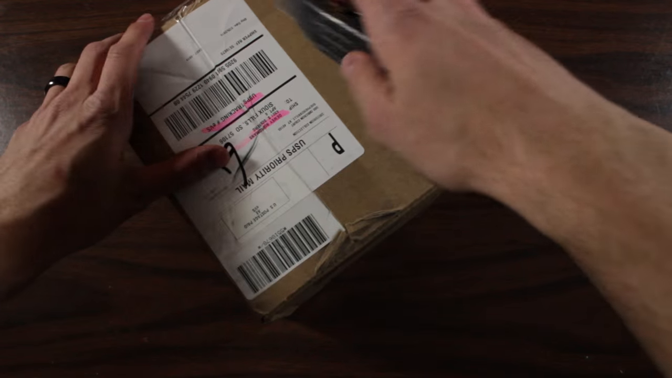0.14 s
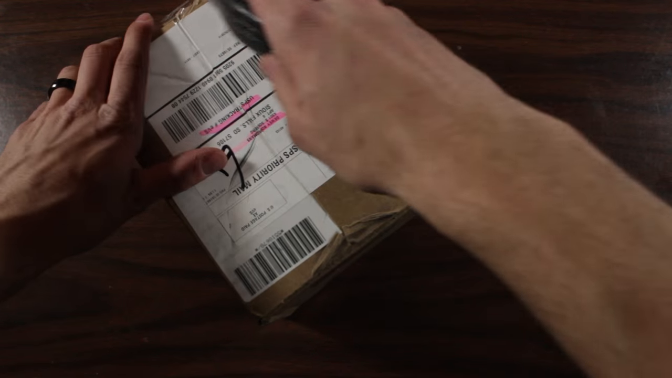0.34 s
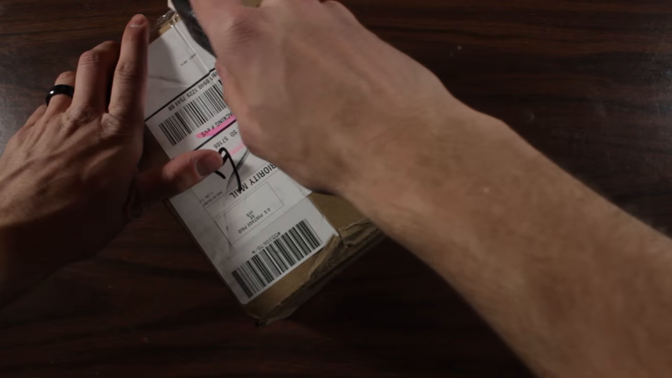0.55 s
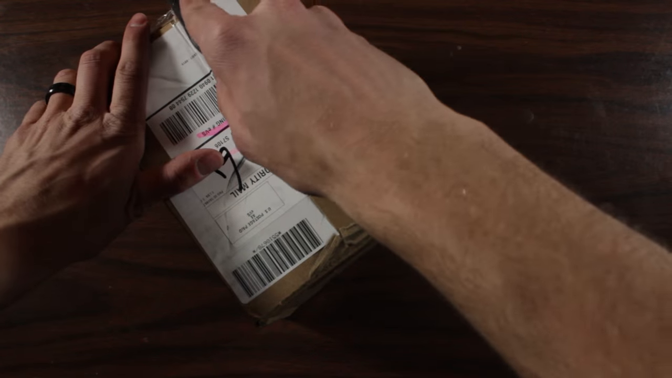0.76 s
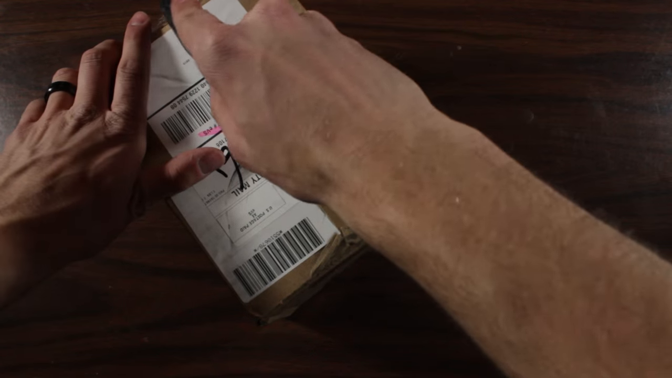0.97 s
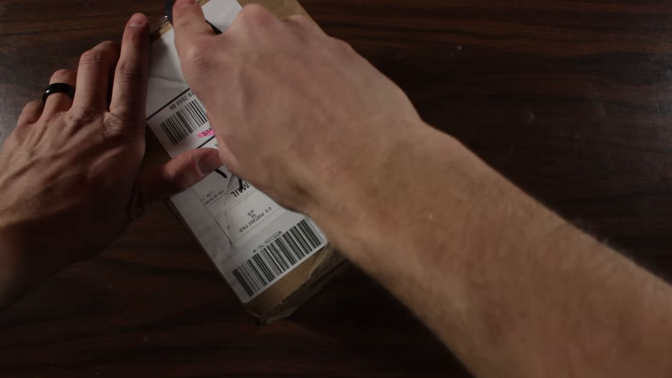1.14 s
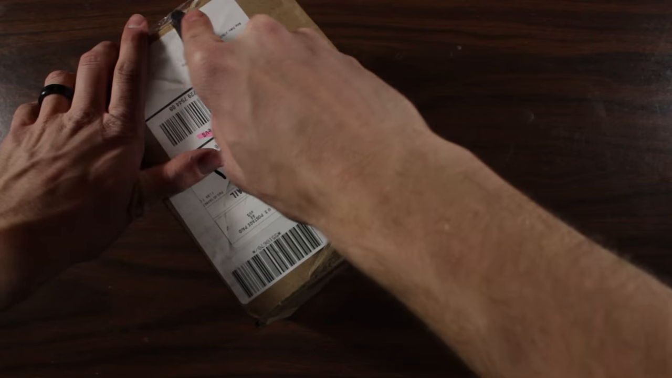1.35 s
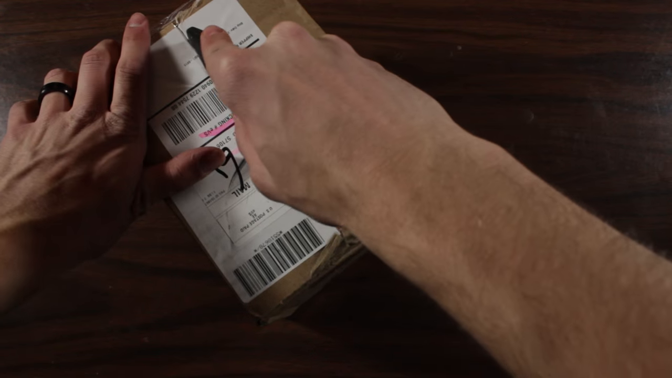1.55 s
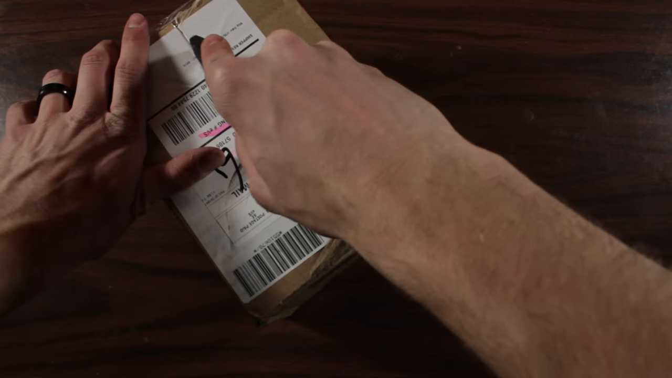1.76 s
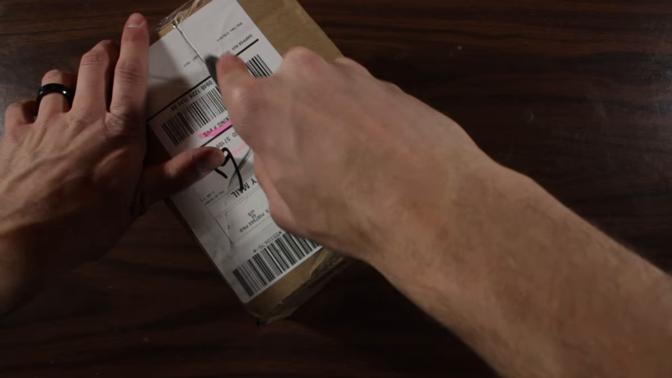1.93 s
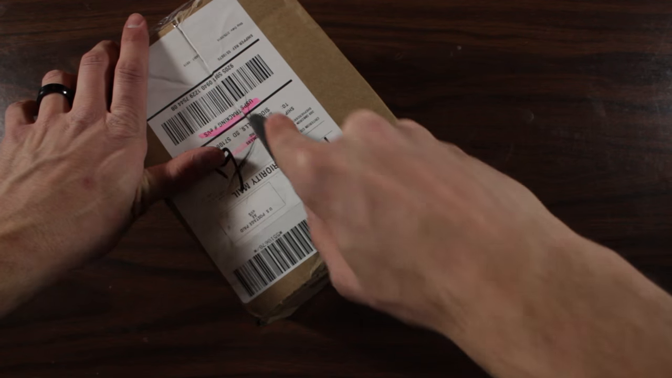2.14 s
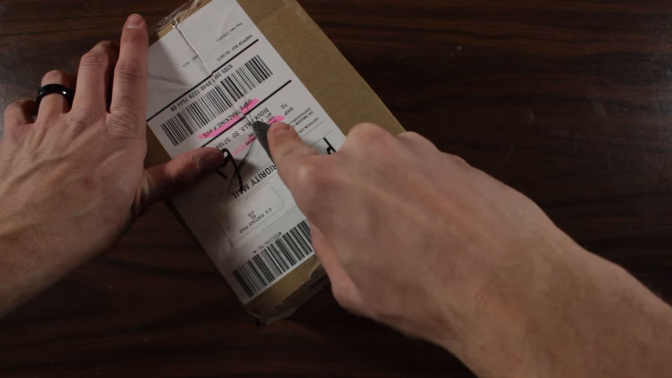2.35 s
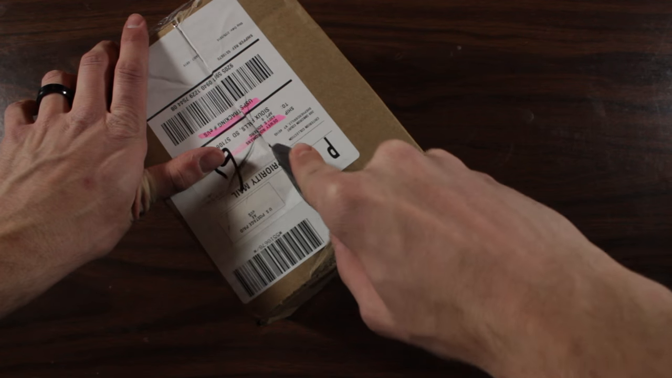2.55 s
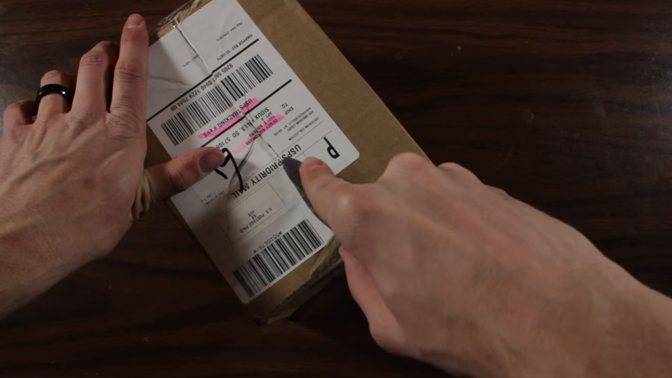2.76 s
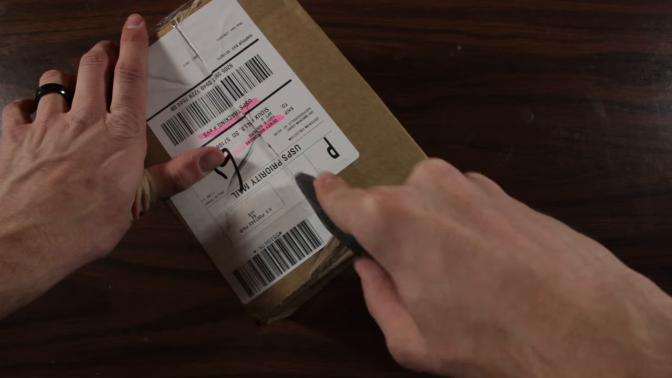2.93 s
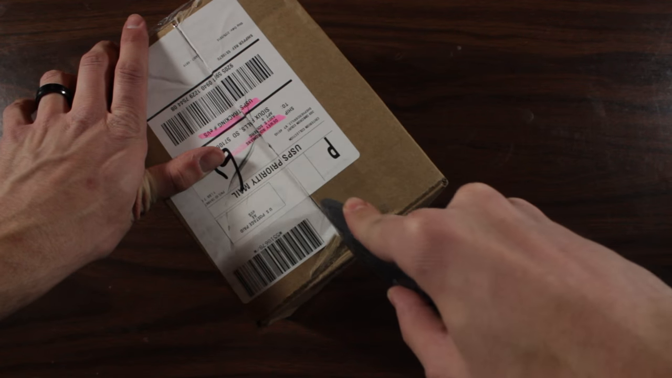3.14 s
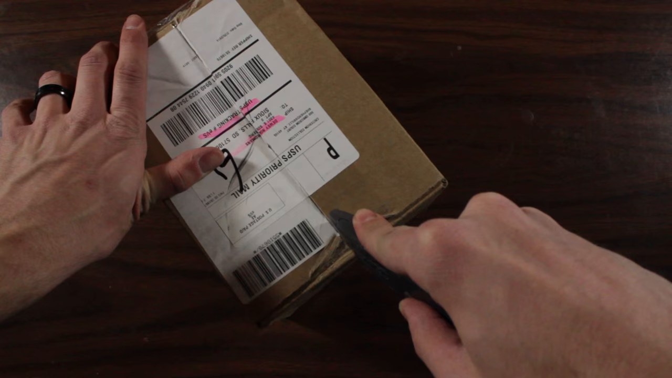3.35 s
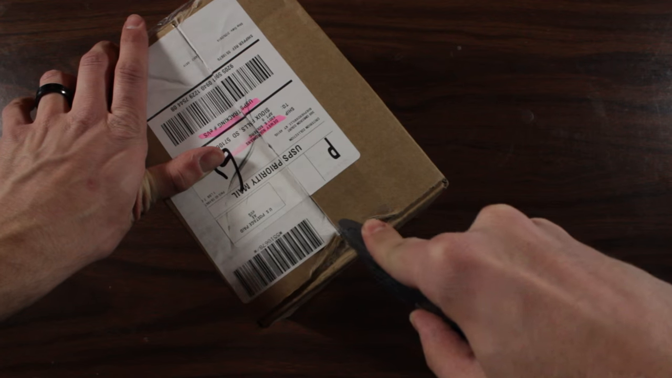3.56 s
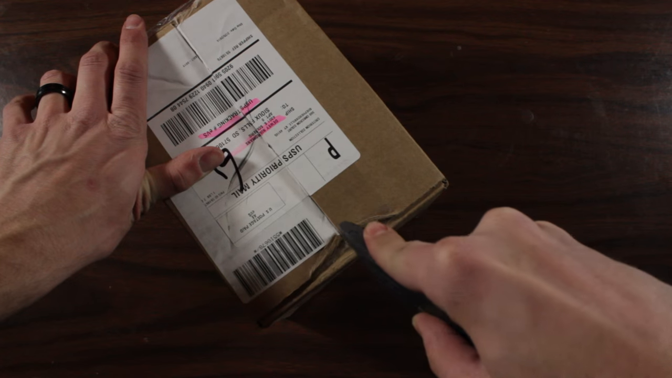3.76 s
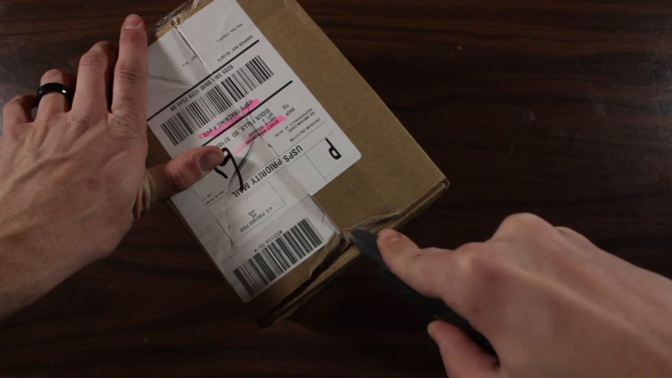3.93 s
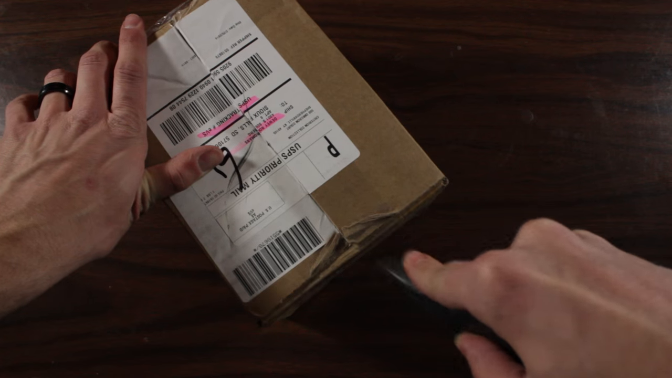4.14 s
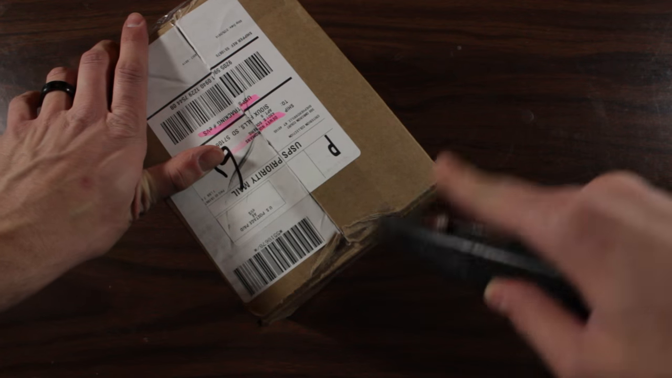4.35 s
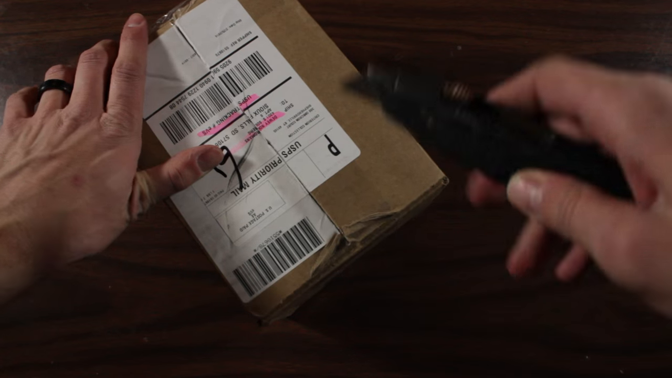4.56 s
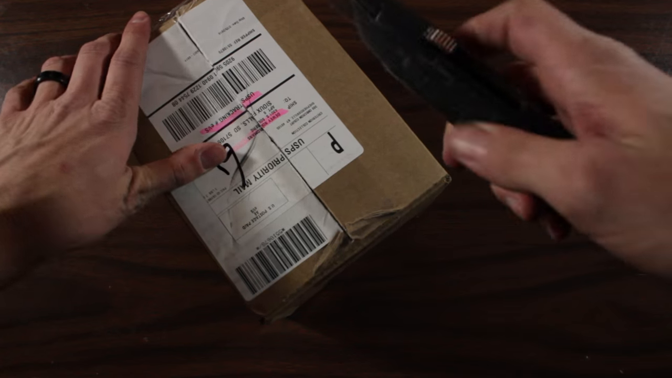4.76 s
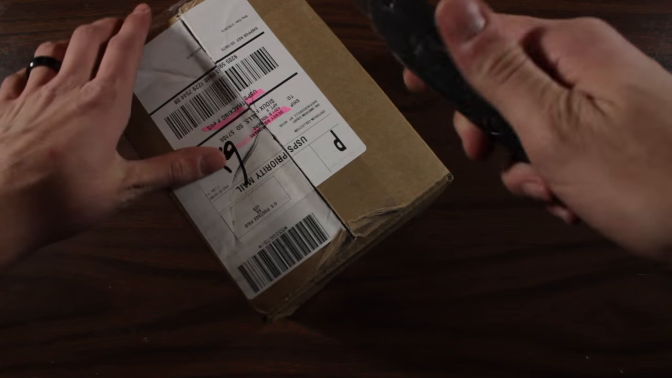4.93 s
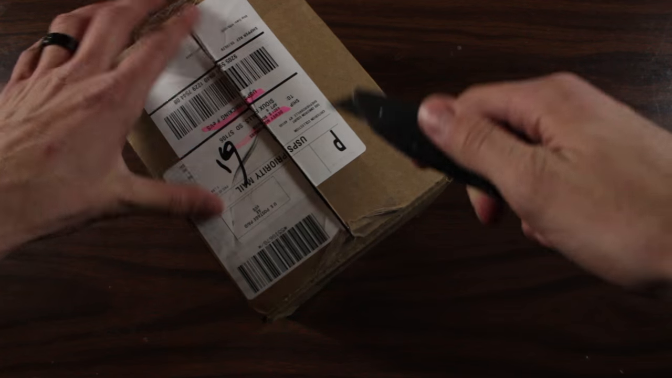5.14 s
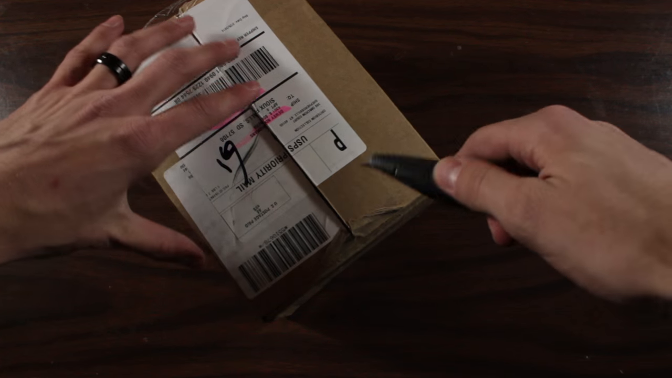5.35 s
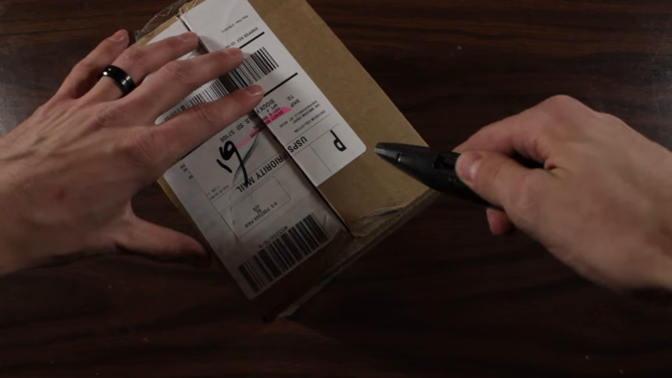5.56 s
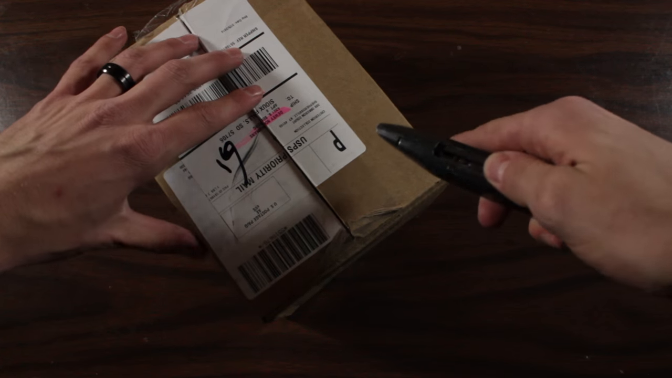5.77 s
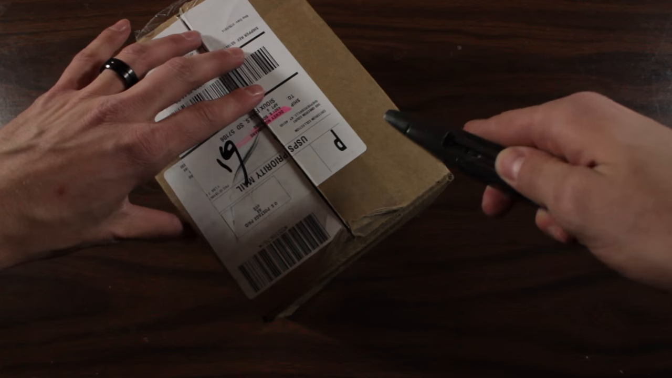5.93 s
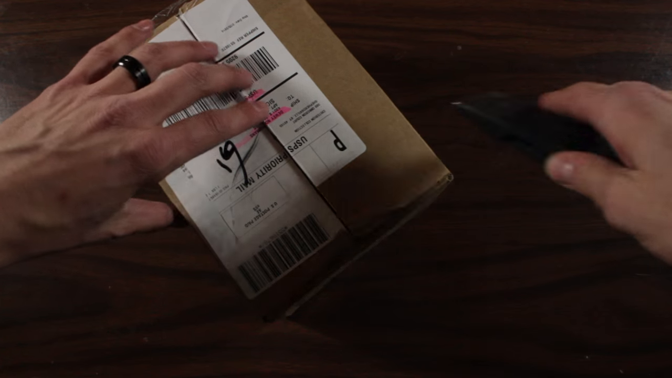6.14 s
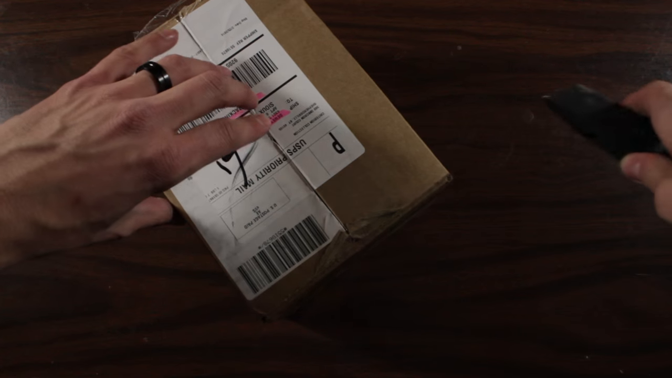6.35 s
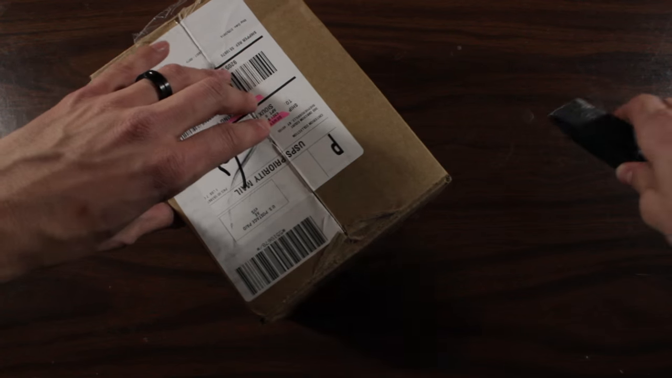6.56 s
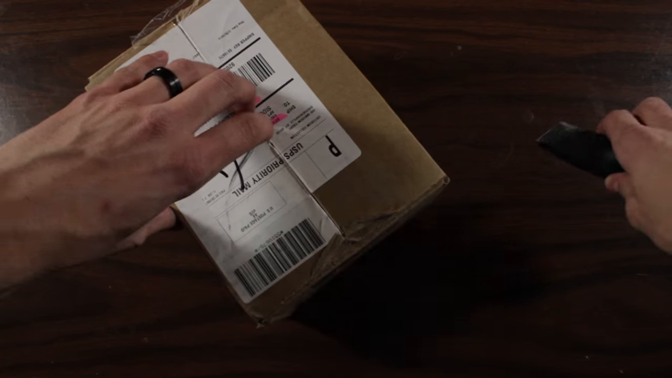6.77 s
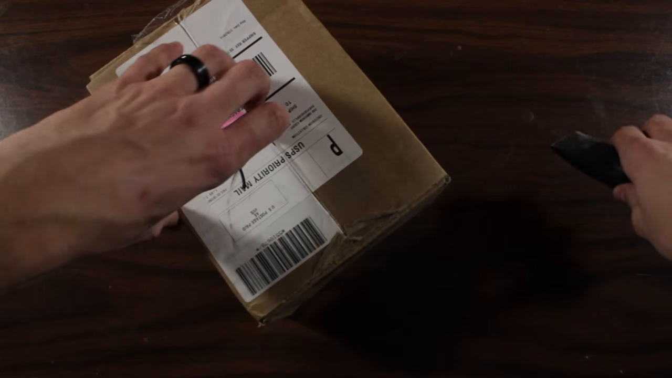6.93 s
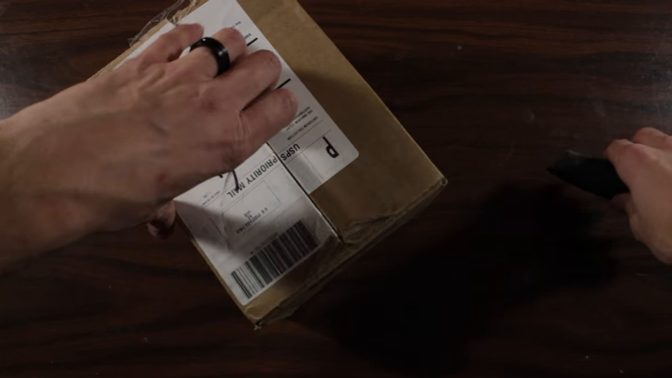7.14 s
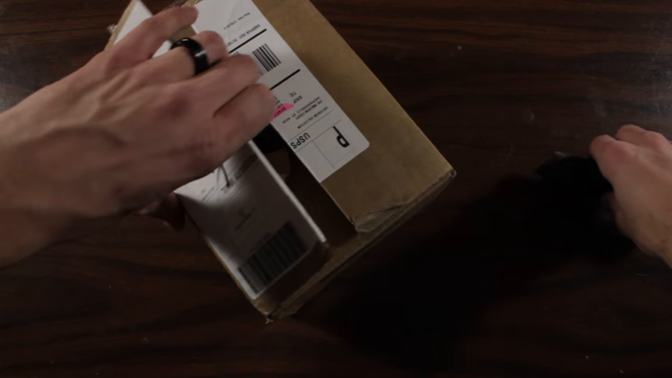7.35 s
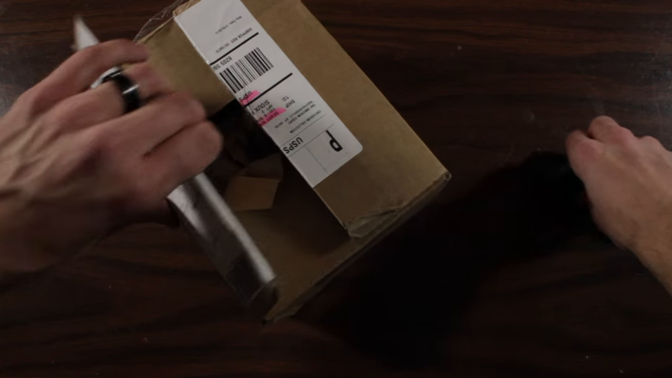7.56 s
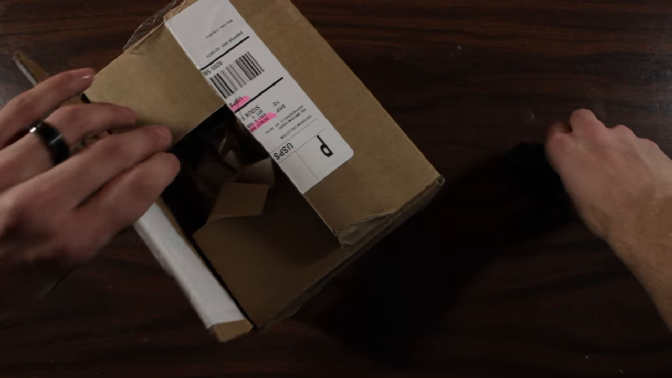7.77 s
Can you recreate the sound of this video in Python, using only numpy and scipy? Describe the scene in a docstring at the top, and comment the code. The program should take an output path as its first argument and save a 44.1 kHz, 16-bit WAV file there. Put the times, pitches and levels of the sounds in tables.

```python
"""Hands rustle faintly in a quiet, humming room; then a utility knife clicks and cuts a taped cardboard box.
Blade and hand on the card: dense random grains drive panel drumming, flap ringing, a rasp and a hiss.
Short cracks, knocks and judder bumps are noise bursts that sound in the air and ring the box; knife clicks
are bursts that ring metal modes. Near the end a hand pulls the flap open and it slaps over as dying noise.
Soft low thuds pass into the wooden table; a short diffuse tail gives the room."""
import sys
import numpy as np
from scipy import signal
from scipy.fft import rfft, irfft
from scipy.io import wavfile
from scipy.ndimage import uniform_filter1d

SR = 44100
rng = np.random.default_rng(int(sys.argv[2]) if len(sys.argv) > 2 else 0)


def output_pcm(signal):
    """Save a mono or channel-first signal as 16-bit PCM at the path in sys.argv[1].

    Samples are clipped to [-1, 1] before scaling.
    """
    pcm = np.clip(np.atleast_2d(signal).T, -1, 1) * 32767
    wavfile.write(sys.argv[1], SR, np.round(pcm).astype(np.int16))


N = 343980


def amp(db):
    """Decibels to gain."""
    return 10 ** (np.asarray(db) / 20)


def rms_one(x):
    """Scale to unit power."""
    return x / np.sqrt(np.mean(x ** 2) + 1e-20)


def filtered(x, order, hz, kind):
    """Butterworth filter."""
    return signal.sosfilt(signal.butter(order, hz, kind, fs=SR, output="sos"), x)


def coloured(x, spectrum):
    """Shape a spectrum by level points on a log frequency axis, then scale to unit power."""
    hz, level_db = np.transpose(spectrum)
    log_hz = np.log(np.maximum(np.fft.rfftfreq(len(x), 1 / SR), 1))
    gain = amp(np.interp(log_hz, np.log(hz), level_db))
    return rms_one(irfft(rfft(x) * gain, len(x)))


def resonance(x, hz, width_hz):
    """Two-pole band-pass, about unit gain at its peak."""
    r = np.exp(-np.pi * width_hz / SR)
    feedback = [1, -2 * r * np.cos(2 * np.pi * hz / SR), r * r]
    return signal.lfilter([(1 - r * r) / 2, 0, (r * r - 1) / 2], feedback, x)


def drift(rate_hz):
    """Slow random wander of unit rms: noise through a double low-pass."""
    r = np.exp(-2 * np.pi * rate_hz / SR)
    wander = signal.lfilter([1], [1, -2 * r, r * r], rng.standard_normal(N + SR))
    return rms_one(wander[SR:])   # the filter settles for 1 s


def ringing(modes, scatter_db):
    """Impulse response of a body: decaying sines, uneven in level and random in sign at each blow."""
    t = np.arange(SR // 8)[:, None] / SR
    hz, level_db, t60_s = np.transpose(modes)
    level_db = level_db + scatter_db * rng.standard_normal(len(hz))
    strength = amp(level_db) * rng.choice([-1, 1], len(hz))
    return (strength * amp(-60 * t / t60_s) * np.sin(2 * np.pi * hz * t)).sum(axis=1)


def burst(rise_ms, rough_db):
    """Rough noise that swells and dies."""
    t = np.arange(SR // 16) / SR / (max(rise_ms, .05) / 1000)   # in rise times
    roughness = amp(rough_db * rng.standard_normal(len(t)))
    return t * np.exp(1 - t) * rng.standard_normal(len(t)) * roughness


def add(out, start_s, sound, peak_db):
    """Place a sound at a time with a given peak."""
    i = round(start_s * SR)
    sound = sound[:N - i]
    out[i:i + len(sound)] += amp(peak_db) * sound / np.abs(sound).max()


# room tone spectrum: (frequency [Hz], relative level [dB])
AIR_SPECTRUM = [(15, 10), (25, -33), (48, -3.5), (102, -9.5), (200, 7), (451, -11.5), (516, -3.5),
                (1190, -3.5), (1560, -8), (7710, -14.5), (16000, -17.5)]
AIR_RMS_DB = -54.5
# distant appliance: (frequency [Hz], width of each of two passes [Hz], rms level [dB])
APPLIANCE_HUM = [(59, 12, -76), (205, 18, -60)]


def still_air():
    """Coloured noise for air, narrow noise bands for a wavering hum."""
    tone = amp(AIR_RMS_DB) * coloured(rng.standard_normal(N), AIR_SPECTRUM)
    for hz, width_hz, level_db in APPLIANCE_HUM:
        narrow = resonance(rng.standard_normal(N), hz, width_hz)
        tone = tone + amp(level_db) * rms_one(resonance(narrow, hz, width_hz))
    return tone


ROOM_T60_S, ROOM_DB = .22, -17


def room(x):
    """Diffuse reflections: a decaying noise tail, slightly dull, of unit energy."""
    t = np.arange(SR // 2) / SR
    tail = rng.standard_normal(len(t)) * amp(-60 * t / ROOM_T60_S) * (t > .004)
    tail = signal.lfilter([1], [1, -.3], tail)
    return signal.fftconvolve(x, tail / np.sqrt(np.sum(tail ** 2)))[:N]


# box bumps the table: (time [s], peak level [dB])
TABLE_BUMPS = [(1.086, -32), (4.154, -24), (7.327, -33), (7.734, -36)]
# table top modes: (frequency [Hz], relative level [dB], t60 [s])
TABLE_MODES = [(105, -19.5, 0.079), (192, -9, 0.097), (252, 1, 0.045)]


def thuds():
    """Soft 2 ms pushes ring the table's low modes."""
    out = np.zeros(N)
    push = np.hanning(SR // 500)
    for start_s, peak_db in TABLE_BUMPS:
        add(out, start_s, signal.fftconvolve(push, ringing(TABLE_MODES, 1)), peak_db)
    return out


# flap folds over: (time [s], reference level [dB], shudder t60 [s])
FLAP_SLAP = (7.7305, -7.5, 0.092)
# box side modes: (frequency [Hz], relative level [dB], t60 [s])
PANEL_MODES = [(204.6, -12, 0.17), (277.5, -2, 0.038), (350.3, 0.5, 0.063), (397.4, 7.5, 0.034),
               (506.4, 6, 0.025)]


def slap():
    """The card shudders: decaying noise over a brief steady floor, dulled, also booming in the panels."""
    out = np.zeros(N)
    start_s, level_db, t60_s = FLAP_SLAP
    t = np.arange(SR // 8) / SR
    shudder = rng.standard_normal(len(t)) * (amp(-60 * t / t60_s) + amp(-16.0))
    dull = filtered(shudder, 6, [170, 1950], "band")
    add(out, start_s, dull + amp(-37.0) * shudder, level_db)
    add(out, start_s, signal.fftconvolve(shudder, ringing(PANEL_MODES, 0)), level_db - 5.0)
    return out


# slider and loose blade: (time [s], reference level [dB])
KNIFE_CLICKS = [(0.6492, -35), (0.716, -11.5), (0.786, -37), (0.958, -21), (1.001, -32), (1.0849, -18.5),
                (5.062, -21), (5.0813, -23), (5.167, -33), (5.412, -34), (5.416, -16.5), (5.4206, -26),
                (5.4258, -17.5), (5.4445, -28), (5.5628, -17.5), (5.649, -35.5), (5.777, -33),
                (5.848, -38.5)]
# knife modes, nominal, about equally strong: (frequency [Hz], t60 [s])
KNIFE_MODES = [(2900, .013), (4500, .01), (6500, .008), (7700, .007)]
CLICK_RISE_MS, RATTLE_RISE_MS, RATTLE_DB = .6, 5.8, -20


def knife():
    """Metal on metal: a dry tick and a slower, weaker rattle ring the knife's modes."""
    out = np.zeros(N)
    for start_s, level_db in KNIFE_CLICKS:
        rattle = amp(RATTLE_DB) * burst(RATTLE_RISE_MS, rough_db=4.0)
        blow = burst(CLICK_RISE_MS, rough_db=4.0) + rattle
        grip = 1 + .03 * rng.standard_normal()   # the grip of the hand shifts the modes
        modes = [(hz * grip, 0, t60_s) for hz, t60_s in KNIFE_MODES]
        ring = signal.fftconvolve(blow, ringing(modes, 4))
        add(out, start_s, filtered(ring, 4, 1950., "high"), level_db - 1.5)
        add(out, start_s, filtered(blow, 4, 1950., "high"), level_db + 4.5)
    return out


# short cracks, knocks and judder bumps of tape, card and box:
# (time [s], crack peak level [dB], box thump reference level [dB], rise [ms])
BOX_CRACKS = [(0.9455, -26.5, -29, 2.1), (1.0874, -27, -10.5, 2), (1.3276, -23.5, -48, 0.59),
              (1.3724, -22, -33.5, 3.7), (1.489, -0.5, -13.5, 1.73), (1.5303, -7, -18, 3.6),
              (1.5485, -8.5, -11, 1.2), (1.8009, -9.5, -15.5, 0.27), (1.8631, -15, -18, 2.9),
              (1.8918, -11, -14.5, 0.58), (1.9787, -13.5, -23.5, 1.7), (2.0044, -15.5, -10.5, 1.26),
              (2.0484, -14, -23, 0.61), (2.0717, -17, -10, 1.3), (2.1191, -14, -25, 4.6),
              (2.1282, -14, -9, 0.41), (2.4687, -15.5, -10.5, 4.06), (2.8873, -20.5, -38, 0.86),
              (2.9282, -6.5, -20, 2.66), (3.6423, -18.5, -59, 0.69), (3.6604, -16.5, -57, 0.46),
              (3.7633, -18.5, -64, 0.8), (3.8325, -10.5, -25, 0.72), (3.892, -22, -18.5, 0.35),
              (3.9822, -17, -28, 2.9), (4.1032, -11.5, -30, 1.7), (4.1502, -19, -35, 1.2),
              (4.1596, -9.5, -61, 1.73), (4.2581, -19.5, -56, 0.29), (4.353, -27, -23.5, 1.2),
              (4.371, -23.5, -26.5, 2.2), (4.535, -15.5, -33, 1.2), (4.72, -22, -49, 1.2),
              (4.753, -23, -53, 1.4), (4.809, -22.5, -52, 0.58), (4.9543, -22, -33.5, 1.7),
              (4.9845, -23, -43, 1.4), (6.548, -30.5, -63, 0.7), (6.58, -34, -56, 0.6),
              (6.6839, -35.5, -26, 0.97), (6.748, -36.5, -27.5, 0.66), (6.807, -27, -29.5, 0.74),
              (6.8433, -25, -49, 0.79), (6.936, -17, -29, 1.2), (6.9614, -22.5, -30, 0.4),
              (7.0022, -22, -43, 1.1), (7.0363, -17, -50, 1.1), (7.0804, -9, -25, 1.46),
              (7.095, -18, -55, 0.89), (7.119, -8.5, -29, 0.3), (7.1473, -20, -48, 2.8),
              (7.1675, -3, -24, 0.21), (7.172, -6, -29, 0.54), (7.1906, -9, -28, 0.22),
              (7.225, -19.5, -27, 1.96), (7.243, -23, -42, 0.41), (7.326, -11.5, -13.5, 0.47),
              (7.3667, -20, -28, 1.8), (7.397, -23, -33, 0.76), (7.707, -33, -30, 2.4)]
# box top modes: (frequency [Hz], relative level [dB], t60 [s])
FLAP_MODES = [(715, -4, .03), (850, -1, .03), (975, 0, .03), (1200, 0, .03), (1400, -6, .025),
              (1850, -7, .02)]
CRACK_SHARE, FLAP_OFFSET_DB = 0.54, -1.5   # flap level lies between crack and thump


def cracks():
    """Each event is a noise burst that cracks in the air, thumps the panels and rings the flap."""
    out = np.zeros(N)
    for start_s, crack_db, thump_db, rise_ms in BOX_CRACKS:
        flap_db = CRACK_SHARE * crack_db + (1 - CRACK_SHARE) * thump_db + FLAP_OFFSET_DB
        blow = burst(rise_ms, rough_db=5.5)
        # the crack's pitch varies at random from event to event
        colour_hz = 3110.0 * amp(2. * rng.standard_normal())
        edge = filtered(blow, 1, [1700., 11000.], "band")
        crack = edge + 4.8 * resonance(blow, colour_hz, .5 * colour_hz)
        add(out, start_s, crack, crack_db)
        add(out, start_s, signal.fftconvolve(blow, ringing(PANEL_MODES, 5.1)), thump_db - 3.5)
        add(out, start_s, signal.fftconvolve(blow, ringing(FLAP_MODES, 1)), flap_db)
    return out


# pressure of blade or hand, one list per gesture, heard as rasp: (time [s], level [dB])
PRESSURE_STROKES = [
    [(0.0, -49), (0.07, -53), (0.16, -63.5), (1.28, -61.5)],
    [(1.35, -44), (1.47, -46.5), (1.58, -43), (1.68, -52)],
    [(1.74, -38.5), (1.84, -35.5), (2.04, -24.5), (2.15, -34.5), (2.24, -39), (2.3, -53.5), (2.42, -65)],
    [(2.5, -41), (2.75, -45), (2.83, -41), (2.9, -42)],
    [(2.97, -44.5), (3.1, -40.5), (3.2, -41), (3.35, -47.5), (3.58, -43), (3.63, -39), (3.68, -57),
     (3.8, -52.5)],
    [(3.85, -39), (3.92, -38), (4.03, -42.5), (4.19, -39.5), (4.24, -57.5), (4.31, -53), (4.4, -48.5),
     (4.47, -55.5)],
    [(4.65, -59.5), (4.9, -55), (5.3, -60.5), (6.2, -61), (6.4, -57), (6.47, -61.5)],
    [(6.65, -53.5), (6.9, -55), (7.06, -48.5), (7.2, -37), (7.28, -45.5), (7.35, -40), (7.41, -42),
     (7.47, -58.5)],
    [(7.6, -49.5), (7.7, -50.5)],
]
# per gesture: (panel drumming re rasp [dB], flap ringing re rasp [dB],
#               hiss re rasp before growth [dB], lone tick drive [dB])
GESTURE_LEVELS = [(1.5, -3, 4.5, -17.5), (4, 1, 1, -6), (1, 2, -2.5, -9.5), (-3, -1, -1, -3.5),
                  (1, 5.5, 0, -5.5), (-4, 0, 1.5, 2), (-2, -3.5, 5.5, -1.5), (1, 3, -2.5, -6.5),
                  (-15, -4.5, 2, -5)]
MEAN_RASP_DB, HISS_GROWTH_DB_PER_DB = -46, 0.18   # hiss grows faster than pressure


def pressure():
    """Level curves in dB of panels, flap, rasp and hiss follow the pressure; ticks follow the gesture."""
    rows = []
    for stroke, (panel_db, flap_db, hiss_db, ticks_db) in zip(PRESSURE_STROKES, GESTURE_LEVELS):
        for time_s, db in stroke:
            growth_db = HISS_GROWTH_DB_PER_DB * (db - MEAN_RASP_DB)
            rows.append((time_s, db + panel_db, db + flap_db, db, db + hiss_db + growth_db, ticks_db))
    time_s, *columns = np.transpose(rows)
    return [np.interp(np.arange(N) / SR, time_s, column) for column in columns]


def grains(per_s, clumps):
    """Random fibre breaks of uneven size, bunched where the blade catches."""
    sizes = amp(3.6 * np.minimum(rng.exponential(1, N), 5)) * rng.choice([-1, 1], N)
    breaks = rng.random(N) < per_s * clumps / SR
    return rms_one(sizes * breaks) * clumps


TICK_DECAY_MS = 0.99   # to 1/e


def ticks(per_s, clumps):
    """Lone fibre breaks, each a tiny dying puff of noise."""
    r = np.exp(-1000 / (TICK_DECAY_MS * SR))
    envelope = signal.lfilter([1], [1, -r], np.abs(grains(per_s, clumps)))
    return rms_one(envelope * rng.standard_normal(N))


BLADE_DB, BLADE_WAVER_DB = -23, 8.5   # mean and spread of each mode's level
BLADE_WIDTH_SHARE = .1   # of mode frequency


def singing(tear):
    """Tearing wakes the knife's modes, each coming and going as the grip changes."""
    out = 0
    for hz, _ in KNIFE_MODES:
        level = amp(BLADE_DB + BLADE_WAVER_DB * drift(4.2))
        out = out + level * rms_one(resonance(tear, hz, BLADE_WIDTH_SHARE * hz))
    return out


# pitch of the freed strip of flap: (time [s], frequency [Hz])
STRIP_PITCH = [(1.7, 1094), (1.8, 1010), (2.3, 1050), (2.5, 1090), (2.92, 1084), (2.96, 853), (3.6, 894),
               (3.8, 1140), (6.6, 1074), (7.2, 1240)]


def flap_ringing(drive):
    """Damped flap modes; those nearest the freed strip's pitch or overtone speak loudest."""
    strip_hz = np.interp(np.arange(N) / SR, *np.transpose(STRIP_PITCH))
    flap = 0
    for hz, level_db, t60_s in FLAP_MODES:
        from_pitch = np.abs(np.log2(hz / strip_hz))
        from_overtone = np.abs(np.log2(hz / 2.15 / strip_hz))
        octaves = np.minimum(from_pitch, from_overtone)
        width_hz = 2 * np.log(1000) / np.pi / t60_s   # doubled: the blade damps the card
        sharp = resonance(resonance(drive, hz, 2 * width_hz), hz, width_hz)
        flap = flap + amp(level_db - 36 * octaves) * rms_one(sharp)
    return flap / np.sqrt(uniform_filter1d(flap ** 2, size=SR))   # level over 1 s


# spectrum of tearing: (frequency [Hz], relative level [dB])
TEAR_SPECTRUM = [(880, -7.5), (1500, -2), (2300, -8), (2510, -8), (2740, -6), (3450, -5), (5070, -12.5),
                 (6630, -10), (8830, -11.5), (14500, -15.5), (16000, -4)]
CREAK_DB = 0   # how strongly lone ticks also knock on the card


def rubbing():
    """Dense grains drive the panels, the flap, a tearing rasp and a fine hiss with lone ticks."""
    panel_db, flap_db, rasp_db, hiss_db, ticks_db = pressure()
    # the harder the cut, the more the blade sticks and slips
    effort = np.clip((rasp_db + 58.0) / 26.0, .3, 1)
    clumps = amp(2.5 * effort * drift(40.))
    lone = amp(ticks_db) * ticks(70., clumps)
    deep = grains(3000., clumps) + amp(CREAK_DB) * lone
    tear = coloured(grains(9000., clumps) + lone, TEAR_SPECTRUM)
    tear = tear + singing(tear)
    rasp = rms_one(filtered(tear, 3, 5000, "low"))
    hiss = rms_one(filtered(tear, 3, 5000, "high"))
    panel = rms_one(signal.fftconvolve(deep, ringing(PANEL_MODES, 0))[:N])
    flap = flap_ringing(deep)
    return amp(panel_db) * panel + amp(flap_db) * flap + amp(rasp_db) * rasp + amp(hiss_db) * hiss


BOX_LOW_HZ = 156   # a small box radiates little below


def scene():
    """Box, knife and table with their room tail, over still air."""
    box = filtered(rubbing() + cracks() + slap(), 4, BOX_LOW_HZ, "high")
    near = box + knife() + thuds()
    return (near + amp(ROOM_DB) * room(near) + still_air())[None]


CUTOFF_HZ = 16600


def record(dry):
    """Round the highest peaks, cut the top."""
    return signal.sosfilt(signal.cheby2(16, 90, CUTOFF_HZ, fs=SR, output="sos"), np.tanh(dry))


dry = scene()
out = record(dry)
output_pcm(out)
```